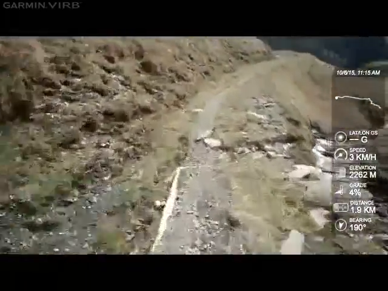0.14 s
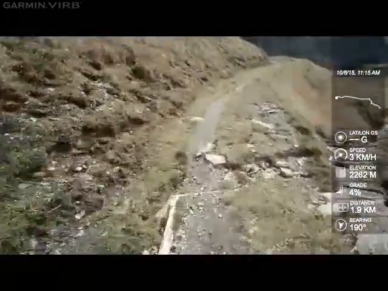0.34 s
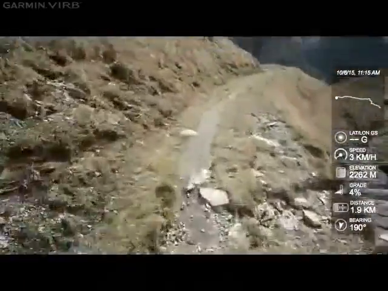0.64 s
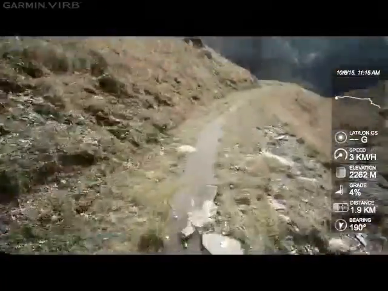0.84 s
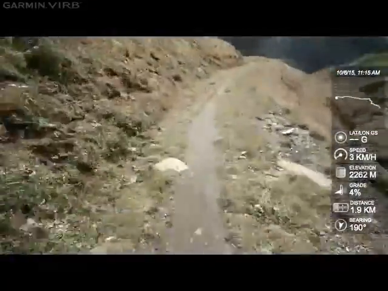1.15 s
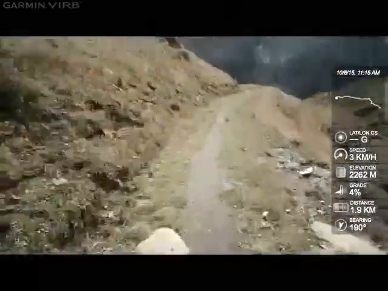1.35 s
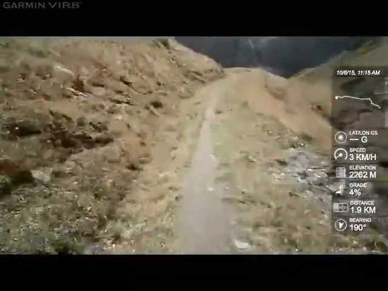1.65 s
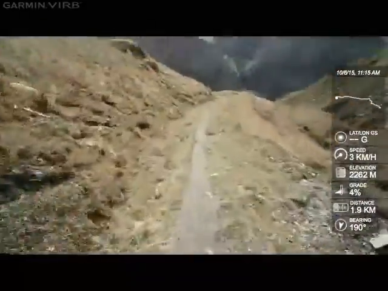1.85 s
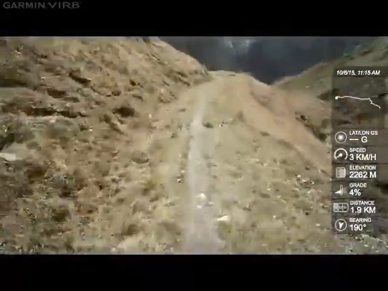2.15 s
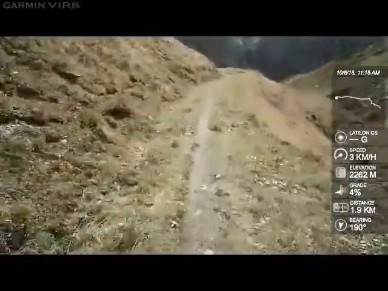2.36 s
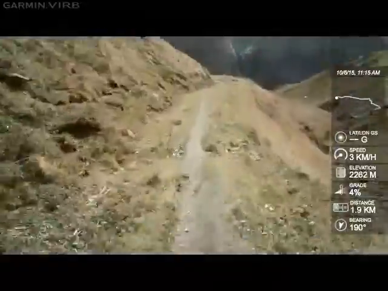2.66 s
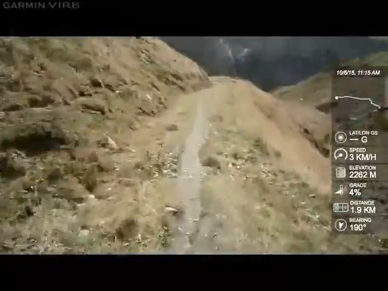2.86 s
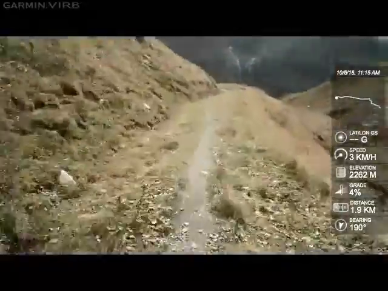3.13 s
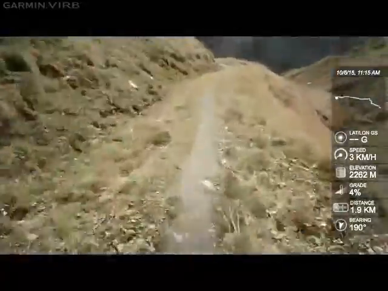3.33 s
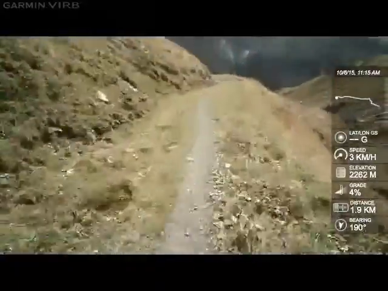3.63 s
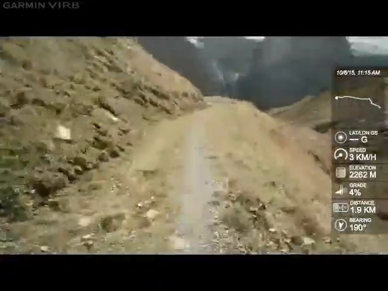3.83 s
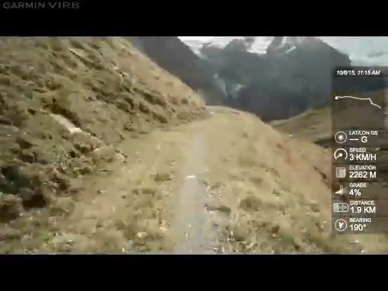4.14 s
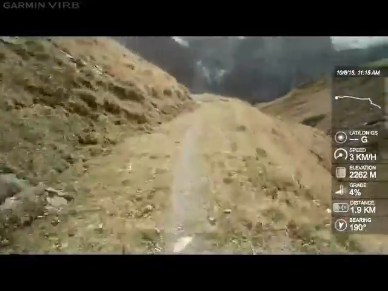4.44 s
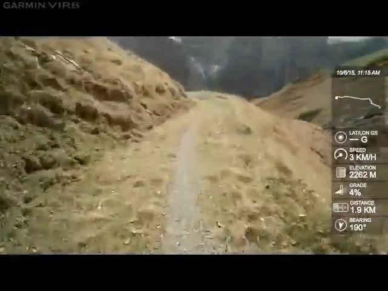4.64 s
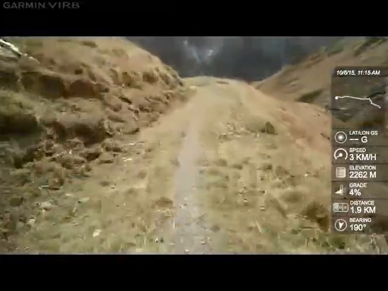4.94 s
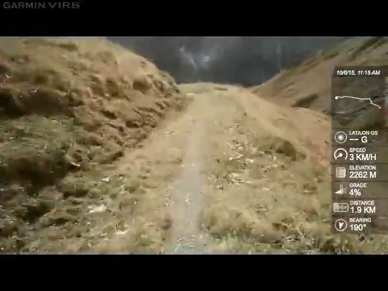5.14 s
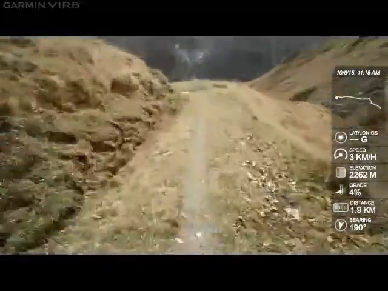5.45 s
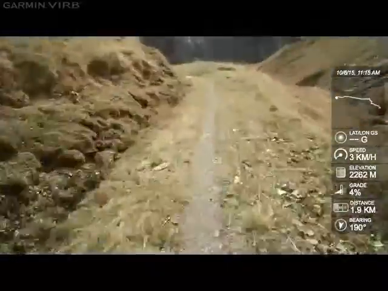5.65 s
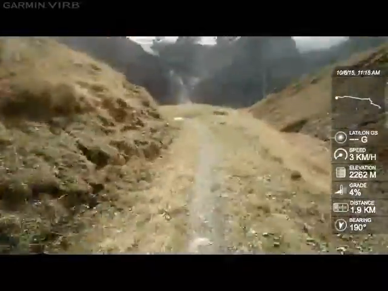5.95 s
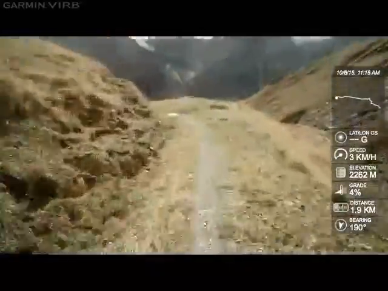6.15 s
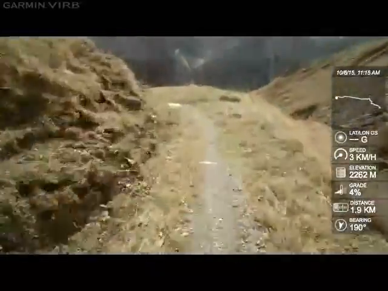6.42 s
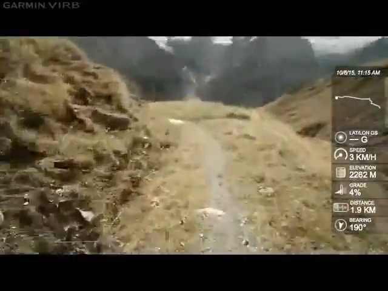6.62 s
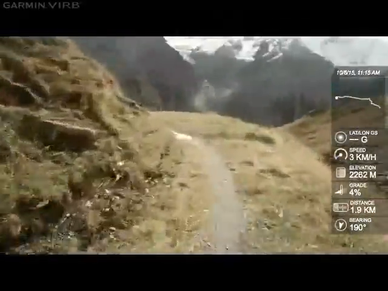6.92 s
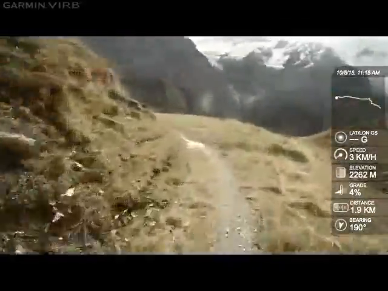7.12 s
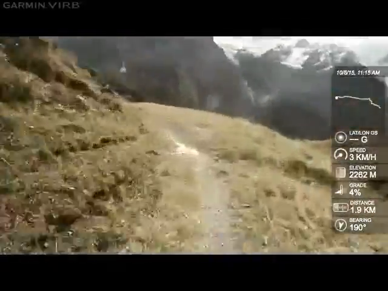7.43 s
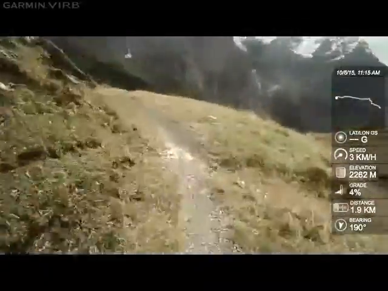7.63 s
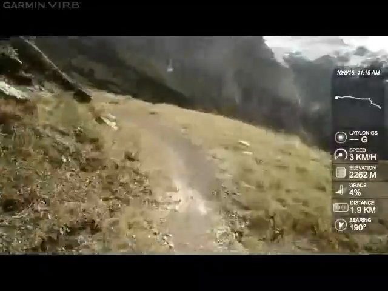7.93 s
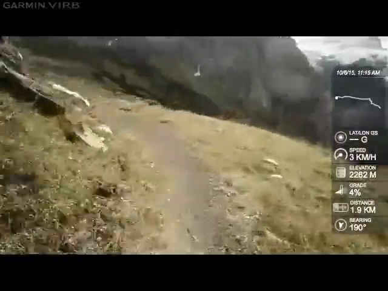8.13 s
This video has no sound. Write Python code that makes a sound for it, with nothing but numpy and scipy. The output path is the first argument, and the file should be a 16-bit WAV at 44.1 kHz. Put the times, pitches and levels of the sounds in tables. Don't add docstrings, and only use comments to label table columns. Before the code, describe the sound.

Low, fluttering wind roar dominates, mixed with dull tyre rumble and a thin hiss. Hollow plastic knocks, double taps and short dry rattles come unevenly as the bike jolts over gravel outdoors, while flung stones click brightly on the frame. A hard crack lands a little after three seconds, gusts strengthen after four, and dense clatter follows before the wind fades. The microphone is close, boxed in and dull in the treble.

```python
import sys
import numpy as np
from scipy import signal
from scipy.fft import rfft, irfft, next_fast_len
from scipy.io import wavfile
from scipy.ndimage import uniform_filter1d, map_coordinates

SR = 44100
rng = np.random.default_rng(int(sys.argv[2]) if len(sys.argv) > 2 else 0)


def generate_wav(signal):
    frames = np.transpose(np.atleast_2d(signal))
    scaled = np.clip(frames, -1, 1) * 32767
    pcm = np.round(scaled).astype(np.int16)
    wavfile.write(sys.argv[1], SR, pcm)


def volts_from_decibels(level):
    exponent = np.asarray(level, float) / 20
    return 10 ** exponent


N = 365148

# (time [s], level [dB])
WIND = [(0, -31.5), (.4, -27.5), (.92, -28), (1.42, -27), (1.6, -27.5), (2.1, -29), (2.9, -28), (3.3, -24),
        (3.85, -25), (4.03, -18.5), (4.6, -23.5), (5.0, -20), (5.35, -18), (5.65, -21.5), (6.5, -26),
        (7.0, -21.5), (7.5, -25), (8.28, -32)]
# (time [s], half length [s], roar swell [dB], deep swell [dB])
EDDIES = [(0.494, 0.3, -3, -4.5), (1.612, 0.077, -3.5, -4.5), (1.873, 0.069, 3, -3.5), (2.383, 0.045, 5, 4),
          (2.618, 0.05, 3.5, 4), (2.852, 0.085, 3.5, 6), (3.035, 0.044, 5.5, -2), (3.245, 0.03, -3.5, 6.5),
          (3.69, 0.066, 5, 1), (4.18, 0.056, 1, 6.5), (4.53, 0.15, 2.5, 6.5), (5.2, 0.12, 0.5, 3.5),
          (5.422, 0.017, 2, 10), (5.542, 0.022, 0, 10), (5.76, .05, 2, 3), (5.916, 0.054, 0.5, 6),
          (6.066, 0.15, 3, -2), (6.194, 0.1, 3, 6.5), (6.557, 0.04, 3.5, 1), (7.306, 0.097, 0.5, 1),
          (7.622, 0.051, 0, 3.5), (7.99, 0.017, 7.5, 2), (8.033, 0.033, 2, 8)]
# (frequency [Hz], density [dB per Hz])
SWAY_SPECTRUM = [(5, -23), (12, -6), (30, 6.5), (45, -3), (60, -5.5), (100, -120)]
# (frequency [Hz], density [dB per Hz])
DEEP_SPECTRUM = [(20, -120), (35, -24.5), (50, -0.5), (100, 0.5), (130, -1.5), (165, -10.5), (290, -120)]
# (frequency [Hz], density [dB per Hz])
ROAR_SPECTRUM = [(70, -120), (110, -5), (150, 1), (205, 3.5), (313, -1.5), (370, -6), (430, -27.5),
                 (700, -120)]
# (frequency [Hz], density [dB per Hz])
RASP_SPECTRUM = [(200, -120), (320, -18.5), (380, -0.5), (470, -2), (600, -11), (720, -18), (850, -24.5),
                 (1100, -51), (1870, -120)]

# (time [s], level [dB])
SHAKING = [(0.0, -63.5), (0.34, -64.5), (0.97, -59.5), (1.29, -62), (2.14, -65.5), (3.02, -56), (3.78, -58),
           (4.15, -49.5), (4.87, -54), (5.16, -50.5), (5.93, -55), (6.3, -55), (6.59, -57), (6.94, -53),
           (7.52, -57), (7.61, -59.5), (8.12, -66.5), (8.28, -61)]
# (frequency [Hz], width [Hz], level [dB])
SIDE_MODES = [(1634, 420, 2.5), (1790, 51, 13.5), (2000, 560, 3), (2400, 650, -26), (2965, 300, -11.5)]
# (frequency [Hz], width [Hz], level [dB])
BACK_MODES = [(1046, 350, 2), (780, 200, -19)]
# (frequency [Hz], width [Hz], level [dB])
MOUNT_MODES = [(3080, 330, -1), (4650, 550, -1.5), (5940, 680, -5), (6800, 590, -3), (7540, 760, -6),
               (9140, 900, -8)]

# (frequency [Hz], density [dB per Hz])
HISS_SPECTRUM = [(900, -120), (1500, -23), (2500, 1), (4000, -1.5), (7000, -2.5), (10400, -3.5),
                 (13500, -34)]

# (time [s], side peak level [dB], back over side panel [dB])
KNOCKS = [(.0466, -41, -2.5), (.308, -40, -4.5), (.3662, -43, -2), (.8431, -42, 2), (.863, -46, -6),
          (1.012, -45, -4), (1.116, -47, 5), (1.614, -45, 5), (2.1084, -41.5, 5), (2.4766, -42, .4),
          (2.5046, -50, 7), (2.7193, -47, 8), (3.0062, -38, 5), (3.788, -44, 6), (3.9137, -38, -1),
          (4.729, -42, 1), (5.613, -41, -2), (6.175, -37, -2), (6.3166, -33.5, 5), (6.3782, -31, 0),
          (6.7651, -43, -1.2), (6.926, -38, 2.5), (7.2321, -39, -2), (7.289, -38, -2), (7.438, -36, 0),
          (7.496, -36, 0), (7.5838, -42, 0), (7.602, -40.5, 4), (7.6915, -41, -5), (8.147, -34.5, -2)]
# (time [s], peak level [dB], frequency [Hz])
SIDE_TAPS = [(.157, -47, 2040), (.4744, -47, 2000), (.739, -38, 1630), (1.181, -41, 1800),
             (1.3504, -49, 1700), (1.6034, -45, 1780), (1.7061, -44, 1950), (1.9335, -49, 2010),
             (3.0446, -36.5, 1800), (3.282, -41, 1660), (3.3105, -47, 2100), (4.532, -44, 1820),
             (4.628, -42, 1800), (3.319, -40, 1910), (3.741, -44, 1830), (6.1578, -34, 1830),
             (6.4673, -37.5, 1790), (6.5247, -36, 1540), (7.4595, -37, 1940), (7.5404, -37, 1900)]
# (time [s], peak level [dB], frequency [Hz])
BACK_TAPS = [(0.436, -39.5, 970), (.7867, -48, 970), (.8108, -35, 1060), (1.5774, -42, 950),
             (4.8445, -41, 1030), (0.984, -46, 1010), (1.021, -43, 980), (5.963, -38, 1010),
             (6.5242, -25.5, 930), (7.353, -35, 930), (7.414, -36, 940), (7.778, -41, 920)]
# (time [s], side level [dB], side frequency [Hz], back level [dB], edge level [dB])
JOLTS = [(.6791, -39, 1890, -48, -48), (.7812, -57, 2060, -42, -50), (.801, -39, 1690, -45, -48),
         (1.0544, -37, 1990, -36, -45), (1.0657, -40, 1740, -41, -41), (1.463, -58, 2280, -50, -47),
         (2.9059, -61, 1940, -54, -52), (3.3254, -35, 1890, -47, -34), (3.3348, -24, 1790, -34, -31),
         (3.3446, -39, 1700, -37, -50), (3.4377, -57, 2320, -58, -45), (3.4652, -34, 2030, -46, -45),
         (4.2409, -66, 2010, -53, -45), (4.7778, -34, 1900, -50, -34.5), (5.502, -57, 2000, -47, -43),
         (5.942, -49, 2140, -51, -44), (6.088, -35, 1950, -38, -41), (6.187, -37, 1970, -35, -34.5),
         (6.283, -52, 2150, -58, -48), (6.5338, -39, 1970, -33, -44), (7.1039, -39, 2050, -67, -43),
         (7.9846, -44, 2070, -62, -51), (8.0237, -41, 1850, -68, -44)]
# (time [s], first level [dB], gap [s], second level [dB])
REBOUNDS = [
    (.756, -46, 0.013, -44),
    (.9243, -46, 0.0079, -36.5),
    (1.077, -47, 0.013, -45),
    (2.3468, -37, 0.0096, -36.5),
    (2.8072, -40, 0.0075, -38),
    (2.9506, -35.5, .0082, -37),
    (4.0093, -34, 0.012, -35),
    (6.227, -43, 0.0072, -39),
]
# (time [s], peak level [dB], frequency [Hz], t60 [s])
PINGS = [
    (0.8004, -21, 1020, 0.018),
    (4.138, -42, 660, .02),
    (5.3225, -30.5, 1050, .02),
    (5.744, -37, 780, .02),
    (6.01, -39, 970, .02),
    (7.984, -35, 600, .02),
    (7.996, -23.5, 553, 0.014),
    (8.227, -45, 950, 0.023),
]
# (time [s], peak level [dB], ring frequency [Hz], ring share [0-1])
TICKS = [(0.5932, -52, 4000, 0.5), (0.7809, -51, 6300, 0.4), (0.8005, -43, 4330, 0.7),
         (0.8095, -50, 6100, 0.5), (1.0518, -51, 6300, 0.4), (1.064, -39.5, 6170, 0.53),
         (1.1546, -47, 7800, 0.7), (1.2314, -51, 4100, 0.4), (1.351, -51, 8700, 0.5),
         (1.4621, -51, 6600, 0.3), (2.9874, -50, 7160, 0.4), (3.0566, -46.5, 4950, 0.4),
         (3.3151, -51, 6600, 0.4), (3.3258, -31.5, 6500, 0.65), (3.3357, -38, 6700, 0.6),
         (3.3468, -50, 4200, 0.4), (3.4308, -48, 7300, 0.85), (3.4369, -49, 4670, 0.4),
         (3.4684, -52, 4900, 0.3), (3.7387, -53, 4450, 0.4), (4.0222, -56, 4700, 0.6),
         (4.1786, -51, 4400, 0.5), (5.0323, -46, 4500, 0.75), (5.0458, -44, 4800, 0.7),
         (6.169, -47, 5500, 0.46), (6.1874, -54, 4800, 0.4), (6.3213, -51, 6700, 0.4),
         (7.1552, -61, 7000, 0.27)]

CALM_DB, STILL_DB = -25, -56
SIDE_HZ, BACK_HZ = 1825, 982
FAR_PANEL_DB = -19
SOFT_EDGE_DB = -25.5


def unit(x):
    return x / np.sqrt(np.mean(x ** 2) + 1e-20)


def along(points, hz):
    f, v = np.transpose(points)
    return np.interp(np.log(hz + 1), np.log(f + 1), v)


def control(rows):
    return np.interp(np.arange(N) / SR, *np.transpose(rows))


def wobble(rate):
    return map_coordinates(rng.standard_normal(int(N * rate / SR) + 4), [np.arange(N) * rate / SR])


def filtered(x, response):
    m = next_fast_len(N + 8192)
    return irfft(rfft(x, m) * response(np.fft.rfftfreq(m, 1 / SR)), m)[:N]


def noise(spectrum):
    return unit(filtered(rng.standard_normal(N), lambda hz: volts_from_decibels(along(spectrum, hz))))


def steady(x, seconds):
    width = round(seconds * SR)
    power = uniform_filter1d(uniform_filter1d(x ** 2, width), width)
    return unit(x / np.sqrt(np.abs(power) + 0.025))


def resonances(modes):
    def mode(k, f):
        centre, width, db = modes[k]
        damping = 1j * f * width
        return (-1) ** k * volts_from_decibels(db) * damping / (centre * centre - f * f + damping)
    return lambda f: sum(mode(k, f) for k in range(len(modes)))


def ring(hz, t60, attack):
    t = np.arange(2048) / SR
    shape = (1 - np.exp(-t / attack)) ** 2 * volts_from_decibels(-60 * t / t60)
    return shape / shape.max() * np.sin(2 * np.pi * hz * t)


def add(track, s, sound):
    track[round(s * SR):][:len(sound)] += sound


def eddies():
    t, swells = np.arange(N) / SR, np.zeros((2, N))
    for s, half, roar_db, deep_db in EDDIES:
        triangle = np.clip(1 - np.abs(t - s) / (2 * half), 0, 1)
        swells += np.outer([roar_db, deep_db], triangle)
    return swells


def wind():
    gust_db = control(WIND) - CALM_DB
    roar_swell, deep_swell = eddies()
    roar_db = control(WIND) + roar_swell
    deep_db = -28 + 0.83 * gust_db + deep_swell + 1.5 * wobble(6)
    rasp_db = -37.5 + 1.224 * gust_db + 0.95 * roar_swell
    sway_db = uniform_filter1d(roar_db, SR // 2) - 11
    sway = volts_from_decibels(sway_db) * noise(SWAY_SPECTRUM)
    deep = volts_from_decibels(deep_db) * steady(noise(DEEP_SPECTRUM), 0.16)
    roar = volts_from_decibels(roar_db) * unit(volts_from_decibels(1.7 * wobble(45)) * steady(noise(ROAR_SPECTRUM), 0.091))
    rasp = volts_from_decibels(rasp_db) * unit(volts_from_decibels(1.72 * wobble(40)) * noise(RASP_SPECTRUM))
    return sway + deep + roar + rasp


def shake():
    chance, size = rng.random(N), rng.standard_normal(N)
    struck = chance < 220 / SR
    jolts = unit(struck * size * volts_from_decibels(1.5 * wobble(12)))
    return volts_from_decibels(2.4 * wobble(35)) * rng.standard_normal(N) + 0.72 * jolts


def contacts():
    soft_t60, hard_t60 = 0.015, 0.0061
    rebound_back_db = 1.7
    seated = list(KNOCKS)
    for s, first_db, gap, second_db in REBOUNDS:
        seated += [(s, first_db, rebound_back_db), (s + gap, second_db, rebound_back_db)]
    touches = []
    for s, db, back_db in seated:
        touches.append((s, db, SIDE_HZ, db + back_db, BACK_HZ, db + SOFT_EDGE_DB, soft_t60))
    for s, db, hz in SIDE_TAPS:
        touches.append((s, db, hz, db + FAR_PANEL_DB, BACK_HZ, db + SOFT_EDGE_DB, soft_t60))
    for s, db, hz in BACK_TAPS:
        touches.append((s, db + FAR_PANEL_DB, SIDE_HZ, db, hz, db + SOFT_EDGE_DB, soft_t60))
    for s, db, hz, back_db, edge_db in JOLTS:
        touches.append((s, db, hz, back_db, BACK_HZ, edge_db, hard_t60))
    return touches


def chatter():
    s, db = np.array(contacts())[:, :2].T
    blows = np.bincount(np.round((s - .006) * SR).astype(int), volts_from_decibels(db - 14.5), N)
    t = np.arange(4096) / SR
    decay = (1 - np.exp(-t / 0.0013)) * volts_from_decibels(-60 * t / 0.077)
    return signal.fftconvolve(blows, decay)[:N]


def housing():
    def side_response(f):
        return resonances(SIDE_MODES)(f) / (1 + (f / 2600) ** 4)

    def back_response(f):
        return resonances(BACK_MODES)(f) / (1 + (f / 2600) ** 4) / (1 + (f / 1350) ** 4)

    shared = shake()
    side_db = control(SHAKING) + 0.76
    back_db = -50.5 + 0.68 * (control(SHAKING) - STILL_DB) + 0.46 * (control(WIND) - CALM_DB)
    back = volts_from_decibels(back_db) * unit(filtered(shared + 1.7 * shake(), back_response))
    side_gain = volts_from_decibels(side_db) + chatter()
    side = side_gain * unit(filtered(shared + 0.72 * shake(), side_response))
    drive_db = uniform_filter1d(control(WIND) + side_db, SR // 6) / 2
    parts = unit(filtered(rng.standard_normal(N) + .4 * shared, resonances(MOUNT_MODES)))
    return back + side + volts_from_decibels(-63 + 1.8 * (drive_db + 37.0)) * parts


def hiss():
    return volts_from_decibels(-62) * noise(HISS_SPECTRUM)


def knocks():
    track = np.zeros(N + 2048)
    touches = contacts()
    spread = rng.standard_normal((len(touches), 3)) * [0.05, 0.05, .035]
    grit = uniform_filter1d(rng.standard_normal((len(touches), 2048)), size=50) * np.sqrt(50)
    for touch, (a, b, c), rough in zip(touches, spread, grit):
        s, side_db, side_hz, back_db, back_hz, edge_db, t60 = touch
        side = ring(side_hz, t60, attack=0.00063) * (1 + 0.3 * rough)
        back = ring(back_hz * (1 + c), t60=0.018, attack=0.0011)
        back += 0.63 * ring(1350 * (1 + a), t60=0.0095, attack=0.00095)
        edge = ring(2600 * (1 + b), t60=0.0032, attack=.0003)
        add(track, s - .0014, volts_from_decibels(side_db) * side)
        add(track, s - .001, volts_from_decibels(back_db + 0.5) * back)
        add(track, s - .0006, volts_from_decibels(edge_db + 3.0) * edge)
    for s, db, hz, t60 in PINGS:
        add(track, s - .001, volts_from_decibels(db) * ring(hz, t60, attack=0.002))
    return track[:N]


def stones():
    track = np.zeros(N + 2048)
    band = signal.butter(2, [2500, 8200], "band", fs=SR)
    grit = signal.lfilter(*band, rng.standard_normal((len(TICKS), 2048)))
    t = np.arange(2048) / SR
    fade = (1 - np.exp(-t / 0.00016)) * volts_from_decibels(-60 * t / 0.022)
    for (s, db, hz, share), crack in zip(TICKS, grit):
        share = np.clip(share, 0, 1)
        tone = share * ring(hz, t60=.009, attack=0.00045)
        add(track, s - .001, volts_from_decibels(db) * (tone + (1 - share) * 3 * crack * fade))
    return track[:N]


def treble_dropouts(x):
    hz, t, z = signal.stft(x, SR, nperseg=2048, noverlap=1536)
    luck = uniform_filter1d(rng.standard_normal(z.shape), size=5, axis=0)
    luck = unit(uniform_filter1d(luck, size=9, axis=1))
    wind_db = np.interp(t * SR, np.arange(N), uniform_filter1d(control(WIND), SR // 4))
    threshold = 2.45 - .08 * (wind_db + 30) - (hz[:, None] - 5000) / 6000
    lost = (luck > threshold) & (hz[:, None] > 2500)
    return signal.istft(z * ~lost, SR, nperseg=2048, noverlap=1536)[1][:N]


def scene():
    return (wind() + housing() + hiss() + knocks() + stones())[None]


def roll_off(x):
    return signal.sosfilt(signal.butter(12, 12000, fs=SR, output="sos"), x)


def record(dry):
    def band_limit(hz):
        return np.clip((10345 - hz) / 30, volts_from_decibels(-33.5), 1)

    mix = filtered(treble_dropouts(dry[0]), band_limit)[None] + .0033
    return roll_off(mix)


dry = scene()
out = record(dry)
generate_wav(out)
```